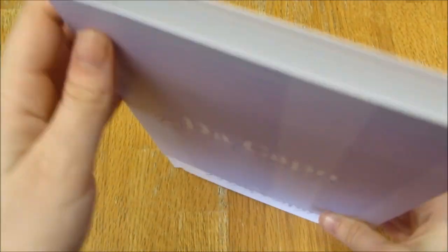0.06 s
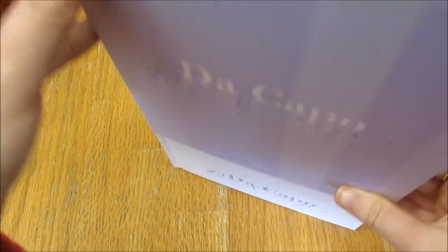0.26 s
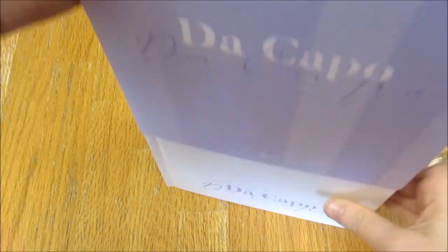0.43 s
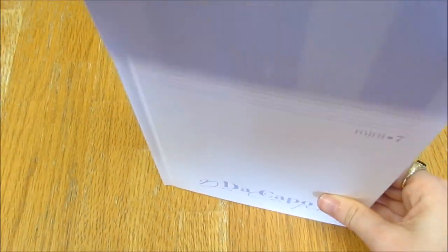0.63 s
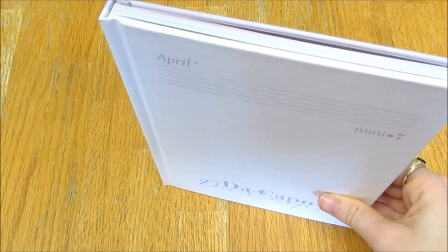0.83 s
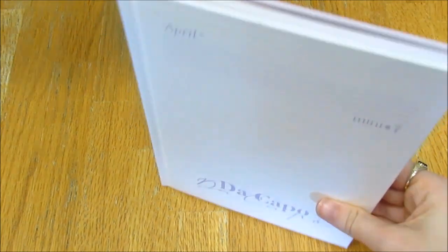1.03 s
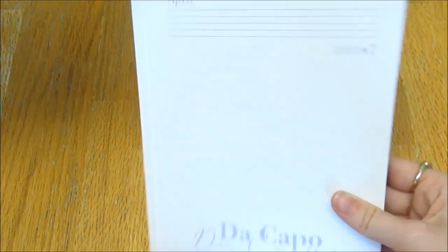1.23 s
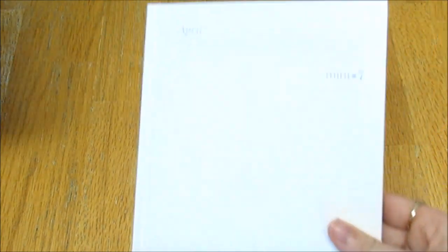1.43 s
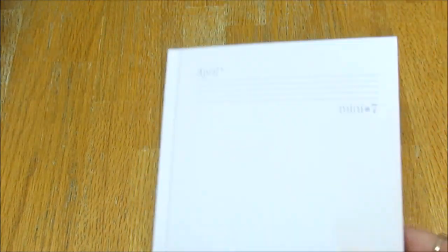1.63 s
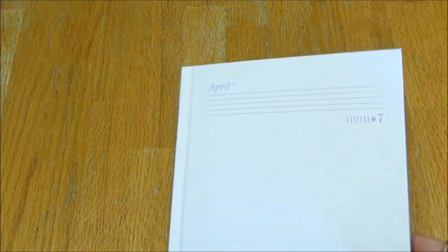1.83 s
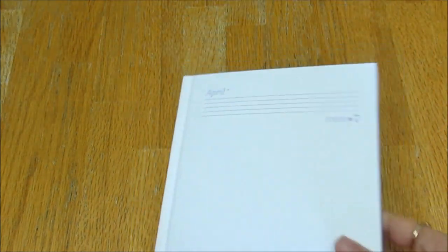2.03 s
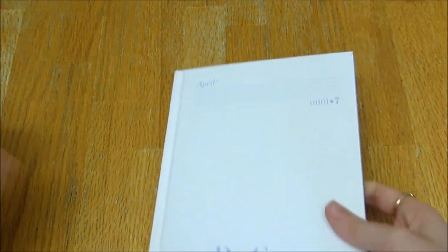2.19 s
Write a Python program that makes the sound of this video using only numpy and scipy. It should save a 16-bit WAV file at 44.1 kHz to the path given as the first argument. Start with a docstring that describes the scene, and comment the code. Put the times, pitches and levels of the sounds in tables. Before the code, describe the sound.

A hardcover book is handled, then slapped down flat on a wooden table.

```python
"""A hardcover book is handled over a wooden table, close by, in a small room.
It bumps the table, a hand slides along its cover and rasps off the edge, and the fingers shift their grip.
Then it touches down, slaps flat in a quick clatter, is nudged across the wood and gets a last soft thud.
Each knock is a short push that makes wood and room ring, and the stiff binding adds bright ticks.
Rubbing is many tiny slips over a smooth hiss. A low murmur of air lies behind it all."""
import sys
import numpy as np
from scipy import signal
from scipy.fft import rfft, irfft, next_fast_len
from scipy.io import wavfile
from scipy.ndimage import uniform_filter1d, map_coordinates

SR = 44100
rng = np.random.default_rng(int(sys.argv[2]) if len(sys.argv) > 2 else 0)


def output_pcm(signal):
    """Save a mono or channel-first signal as 16-bit PCM at the path in sys.argv[1].

    Samples are clipped to [-1, 1] before scaling.
    """
    pcm = np.clip(np.atleast_2d(signal).T, -1, 1) * 32767
    wavfile.write(sys.argv[1], SR, np.round(pcm).astype(np.int16))


N = 99533

TOP_HZ = 15900  # upper limit of the sound
# centres of the six bands, bass to treble, in which a knock's strength is given: f/Hz
BAND_CENTRES_HZ = [170, 450, 1000, 2000, 4500, 10000]


def knocks():
    """Each contact of book, hand and table is a short push that shakes the boards and rings the room."""
    # the contacts: t/s, six band levels/dB, ring of wood and room/dB
    contacts = [(0.001, 16, 5, -7, -17.5, -21, -29.5, 6), (0.088, 10, -8, -15, -8, -43, -64, -0.5),
                (0.73, 3.5, -10, 0.5, -3.5, -29, -37, 0.5), (0.806, 3, -10, -3, -22, -46, -51, -19),
                (0.8952, -5, -17.5, -22, -6.5, -44, -26, -11), (0.9166, 1.5, -16, -16, -14, -56, -52, -3),
                (0.9344, 4, -8.5, -11, -7, -27, -46, -10.5), (1.456, -3, 1, -4, -10, -33, -37, -12),
                (1.4597, -5, -4, -11, -25, -56, -57, -18), (1.621, 2.5, 3, 3.5, -6.5, -18, -27, 0.5),
                (1.659, 0, -11, -27, -30, -33, -40, -8), (1.7406, 8, 4, 3.5, 5, 1, -9.5, 4),
                (1.7977, 8, 10, 8.5, 3.5, 3.5, -5, 1.5), (1.8143, 9.5, 11.5, 24, 19.5, 7.5, -11.5, -2.5),
                (1.81546, -12, 3, 22, 15, 9, -4, -17), (2.045, -33, -7.5, -6, -20, -29, -34, 4),
                (2.1805, 12, 12, -12, -24, -13, -20, -4)]
    # how strongly book and table turn a blow into sound: f/Hz, level/dB
    body = [(30, -29), (58, -8.5), (84, 3), (118, -0.5), (175, 2.5), (560, 2), (680, -1.5), (1050, -1.5),
            (1380, -7.5), (1800, -3.5), (2500, -1), (3300, -4)]
    top_loss_db, low_cut_hz = -16.5, 167
    out = np.zeros((2, N))
    for start, *bands_db, ring_db in contacts:
        colour = list(zip(BAND_CENTRES_HZ, bands_db)) + [(TOP_HZ, bands_db[-1] + top_loss_db)]
        push = shortest_pulse(lambda hz: amp(along(colour, hz) + along(body, hz)))
        shudder = amp(1.5) * burst(t60=0.08)  # the boards shake and quickly settle
        wash = shudder + amp(3) * room_echo()
        wash = filtered(wash, lambda hz: 1j * hz / (1j * hz + low_cut_hz))  # deep bass is left to notes
        response = amp(ring_db) * (wood_ring() + wash) + bare_contact()
        add(out, start, signal.fftconvolve(response, -push[None], axes=1))
    return out


def bare_contact(contact_s=0.00052):
    """The blow itself: waves that bend the wood bring the treble first."""
    hz = np.fft.rfftfreq(SR // 2, 1 / SR)
    phase = 4 * np.pi * contact_s * np.sqrt(hz * BAND_CENTRES_HZ[2])
    return irfft(np.exp(-1j * phase), SR // 2)


def wood_ring():
    """Table and cover ring at their own notes, in a slightly different mix at each blow."""
    # the notes of table and cover: f/Hz, level/dB, time to fade by 60 dB/s
    notes = [(83.6, 7.5, 0.35), (196.6, 7, 0.37), (288.2, 10.5, 0.3), (447, -2, 0.17), (512, 11.5, 0.84),
             (736, 0, 0.18), (776, 10.5, 0.37), (956, 4, 0.41), (1006, 13.5, 0.29), (1146, 0, 0.12),
             (1703, 11, 0.39), (1787, 1.5, 0.093), (2040, 4, .22), (2300, 2, 0.5)]
    t = np.arange(SR // 2) / SR
    ring = np.zeros(len(t))
    for k, (hz, db, t60) in enumerate(notes):
        decay = np.log(1000) / t60
        gain = (-1) ** k * amp(db + rng.normal(0, 1)) * 2 * decay / SR
        ring += gain * np.exp(-decay * t) * np.sin(2 * np.pi * hz * t)
    return ring


def twangs(rise_s=0.0036):
    """Some notes of the boards stand out at single blows, depending on where they are struck and held."""
    # the notes that stand out: t/s, f/Hz, level/dB, time to fade by 60 dB/s
    notes = [(0.001, 194.5, -19.5, 0.22), (0.722, 1725, -39, 0.33), (0.726, 253, -28, 0.16),
             (0.735, 60.3, -36, 0.28), (1.4565, 561, -29.5, 0.033), (1.4561, 1136, -26.5, 0.023),
             (1.4574, 1922, -39, 0.042), (1.458, 4480, -41, 0.022), (1.623, 1330, -29, 0.067),
             (1.741, 489.4, -28, 0.48), (1.745, 2890, -32, .2), (1.7972, 1747, -17, 0.071),
             (1.8144, 1036, -29, 0.46), (1.8142, 1085, -20.5, 0.27), (1.8149, 2060, -31, 0.16),
             (1.8149, 2300, -31.5, 0.4), (2.045, 707, -34, 0.071), (2.181, 196, -31, 0.2),
             (2.181, 296, -28.5, 0.19), (2.179, 1013, -44.5, 0.22)]
    out = np.zeros((2, N))
    t = np.arange(SR // 2) / SR
    for start, hz, db, t60 in notes:
        loudness = amp(db - 60 * t / t60) * (1 - np.exp(-t / rise_s))
        add(out, start, (loudness * np.sin(2 * np.pi * hz * t))[None])
    return out


def binding_ticks():
    """The stiff binding gives short bright snaps."""
    # the snaps: t/s, level/dB
    snaps = [(1.0162, -25), (1.0223, -15), (1.0368, -23), (1.7445, -15), (1.746, 0), (1.7507, -14),
             (1.7627, -12)]
    # their bright tone: f/Hz, level/dB
    colour = [(1000, -38), (4000, -10), (6600, -8), (7700, 7), (8800, 0), (11000, 1), (16000, -11)]
    out = np.zeros((2, N))
    pulse = shortest_pulse(lambda hz: amp(along(colour, hz)))
    for start, db in snaps:
        snap = burst(t60=0.0056) + amp(-12.5) * room_echo()
        add(out, start, amp(db) * signal.fftconvolve(snap, pulse[None], axes=1))
    return out


def hand_slide():
    """A hand rubs along the cover, loudest as it nears the edge."""
    # loudness of the slide: t/s, level/dB
    course = [(0.05, -57), (0.115, -40), (0.26, -38), (0.34, -39), (0.385, -47.5), (0.405, -39.5),
              (0.48, -38), (0.57, -31.5), (0.66, -26.5), (0.715, -29.5), (0.732, -36.5), (0.745, -59)]
    # tone of the hand on the cover: f/Hz, level/dB
    colour = [(180, -23), (300, -7.5), (337, -39), (417, -12), (553, -6), (652, -7.5), (1020, -8),
              (1180, -2.5), (4650, -1), (8280, -5.5), (15500, -17.5)]
    times, db = np.transpose(course)
    loudness = amp(np.interp(np.arange(N) / SR, times, db, left=-120, right=-120))
    return loudness * friction(lambda hz: amp(along(colour, hz)))


def edge_rasp():
    """Rubbing makes the cover sing, mostly higher and higher as the hand nears the edge."""
    # the cover's notes: f/Hz, width/Hz, peak t/s, level/dB, rise/s, fall/s
    notes = [(990, 64, 0.607, -41, .085, 0.023), (1340, 630, 0.687, -34.5, 0.025, 0.033),
             (1720, 68, .706, -26.5, 0.032, 0.016), (2340, 200, .715, -26.5, 0.013, 0.019),
             (2640, 280, 0.713, -25.5, 0.038, .014), (3420, 110, 0.698, -34, 0.06, 0.013)]
    out = np.zeros((2, N))
    for hz, width_hz, *stroke in notes:
        note = friction(lambda f: 1 / (1 + ((f - hz) / width_hz) ** 2))
        power = np.abs(uniform_filter1d(np.mean(note ** 2, axis=0), size=SR // 40))
        steady_note = note / np.sqrt(power + 1e-9)
        out += swell(*stroke) * steady_note
    return out


def finger_brushes():
    """Fingers brush the cover with a light hiss."""
    # the brushes: peak t/s, level/dB, rise/s, fall/s
    brushes = [(0.26, -45.5, 0.047, 0.077), (1.145, -43, 0.045, 0.039), (1.26, -59.5, 0.097, 0.1)]
    # their tone: f/Hz, level/dB
    colour = [(290, -16), (500, -9.5), (1130, -4), (1310, -10), (2390, -8.5), (4070, -14), (10100, -3.5),
              (15500, -14.5)]
    return strokes(brushes, colour)


def table_scrapes():
    """The book scrapes lightly on the wood."""
    # the scrapes: peak t/s, level/dB, rise/s, fall/s
    scrapes = [(1.30, -54.5, 0.045, 0.06), (1.69, -50.5, 0.079, 0.25), (2.08, -49.5, 0.054, 0.066),
               (2.225, -56.5, 0.045, 0.026)]
    # their tone: f/Hz, level/dB
    colour = [(200, -13), (600, 11.5), (1300, 4.5), (3000, 1), (6000, -3.5), (10000, -8), (15500, -16)]
    return strokes(scrapes, colour)


def book_bends():
    """The held book bends with a soft, low rumble."""
    # the bends: peak t/s, level/dB, rise/s, fall/s
    bends = [(0.27, -43.5, 0.018, 0.024), (0.47, -48, 0.031, 0.025), (0.565, -44, 0.024, 0.034),
             (1.135, -47.5, 0.028, 0.027)]
    # their deep tone: f/Hz, level/dB
    colour = [(25, -29), (55, -20), (85, 4.5), (130, -17), (250, -12), (600, -30.5)]
    return strokes(bends, colour)


def strokes(rows, colour):
    """Rubbing that swells and fades once for each row."""
    return sum(swell(*row) for row in rows) * friction(lambda hz: amp(along(colour, hz)))


def friction(response, slips_per_s=5100, slip_share=0.21, flutter_db=0.18):
    """Rubbing surfaces make many tiny slips over a smooth hiss; response sets the tone."""
    slips = (rng.random((2, N)) < slips_per_s / SR) * rng.standard_normal((2, N))
    hiss = rng.standard_normal((2, N))
    rub = np.sqrt(slip_share) * unit(slips) + np.sqrt(1 - slip_share) * hiss
    steps = np.arange(N) * 70 / SR  # the level wavers through 70 random values a second
    flutter = map_coordinates(rng.standard_normal(N // 100), [steps], mode="wrap")
    rub = filtered(patchy(rub, depth_db=2) * amp(flutter_db * flutter), response)
    return unit(stereo(rub, side_db=-7))  # nearer and narrower than the blows


def patchy(x, depth_db):
    """The tone of rubbing drifts between bright and dull as the contact moves."""
    spectrum = signal.stft(x, nperseg=512)[2]
    patches = uniform_filter1d(rng.standard_normal(spectrum.shape[1:]), size=4, axis=0)  # blur in pitch
    patches = uniform_filter1d(patches, size=18, axis=1)  # blur in time
    return signal.istft(spectrum * amp(depth_db * unit(patches)), nperseg=512)[1][:, :N]


def room_echo(rise_s=0.0041):
    """The small room's echo builds quickly and dies away, treble first."""
    # how long the room rings: f/Hz, time to fade by 60 dB/s
    fade_times = [(80, 0.53), (250, 0.55), (600, 0.38), (1100, 0.45), (2200, 0.39), (5000, 0.37),
                  (12000, 0.27)]
    n = SR // 2
    hz, t, spectrum = signal.stft(rng.standard_normal((2, n)), SR, nperseg=256)
    fade = amp(-60 * t / along(fade_times, hz)[:, None])
    echo = signal.istft(spectrum * fade, SR, nperseg=256)[1][:, :n]
    echo *= 1 - np.exp(-np.arange(n) / SR / rise_s)
    return stereo(echo / np.linalg.norm(echo[0]))


def room_tone(level_db=-50.5):
    """A low steady murmur of air with faint hiss, from all around."""
    # tone of the air: f/Hz, level/dB
    colour = [(25, -12), (60, -21), (110, -7.5), (160, -0.5), (250, -5), (450, -14), (1000, -18),
              (2400, -24), (4500, -30), (15000, -35.5)]
    # its stereo width: f/Hz, side over middle/dB
    spread = [(60, -16), (160, -13.5), (400, 3), (900, 4), (2000, -7), (5000, -3.5), (13000, -0.5)]
    air = filtered(rng.standard_normal((2, N)), lambda hz: amp(along(colour, hz)))
    return amp(level_db) * unit(stereo(air, spread))


def burst(t60):
    """A puff of stereo noise that fades by 60 dB in t60 seconds."""
    t = np.arange(SR // 2) / SR
    puff = rng.standard_normal((2, len(t))) * amp(-60 * t / t60)
    return stereo(puff / np.linalg.norm(puff[0]))


def swell(peak_s, db, rise, fall):
    """A gain that climbs to db at peak_s and fades again."""
    t = np.arange(N) / SR
    return amp(db) * np.exp(-((t - peak_s) / np.where(t < peak_s, rise, fall)) ** 2)


def stereo(pair, spread=None, side_db=0):
    """Turn two unrelated signals, the middle and the side, into left and right."""
    # stereo width, narrow in the bass and wider in the treble: f/Hz, side over middle/dB
    usual_spread = [(60, -52), (160, -27), (500, -12.5), (1000, -9.5), (2000, -17), (4000, -13.5),
                    (8000, -3.5), (13000, -0.5)]
    side = filtered(pair[1], lambda hz: amp(along(spread or usual_spread, hz) + side_db))
    return np.array([pair[0] + side, pair[0] - side])


def shortest_pulse(gain, size=4096):
    """The shortest click that has the given gain at each frequency."""
    hz = np.fft.rfftfreq(size, 1 / SR)
    cepstrum = irfft(np.log(np.maximum(gain(hz), 1e-6)))
    # folding the second half onto the first packs the energy at the start
    cepstrum[1:size // 2] *= 2
    cepstrum[size // 2 + 1:] = 0
    return irfft(np.exp(rfft(cepstrum)))


def filtered(x, response):
    """Scale each frequency in x by response(hz)."""
    n = x.shape[-1]
    padded = next_fast_len(n + SR // 4)
    hz = np.fft.rfftfreq(padded, 1 / SR)
    return irfft(rfft(x, padded) * response(hz), padded)[..., :n]


def along(points, hz):
    """Read between (Hz, value) points, with octaves evenly spaced."""
    freqs, values = np.transpose(points)
    return np.interp(np.log(hz + 1), np.log(freqs + 1), values)


def add(out, start_s, x):
    """Mix x into out from start_s on."""
    i = max(round(start_s * SR), 0)
    out[:, i:i + x.shape[1]] += x[:, :N - i]


def amp(db):
    """Turn decibels into a gain."""
    return 10 ** (np.asarray(db) / 20)


def unit(x):
    """Scale to an average power of 1."""
    return x / np.sqrt(np.mean(x ** 2) + 1e-20)


def scene(balance_db=-0.25):
    """Knocks, rubbing and air together, just right of centre."""
    hits = knocks() + twangs() + binding_ticks()
    rubs = hand_slide() + finger_brushes() + table_scrapes() + book_bends()
    rasp = edge_rasp()
    into_room = amp(-15) * rubs + amp(-17.5) * rasp  # the rasp is nearer, so it echoes less
    echo = signal.fftconvolve(into_room, room_echo(), axes=1)[:, :N]
    return (hits + rubs + rasp + echo + room_tone()) * amp([[balance_db], [-balance_db]])


def record(dry):
    """Cut away the very highest treble, above TOP_HZ."""
    return filtered(dry, lambda hz: 1 / np.sqrt(1 + (hz / TOP_HZ) ** 160))


dry = scene()
out = record(dry)
output_pcm(out)
```